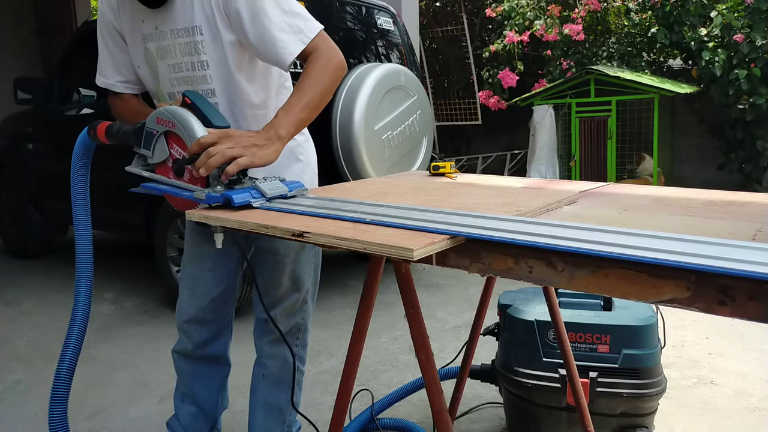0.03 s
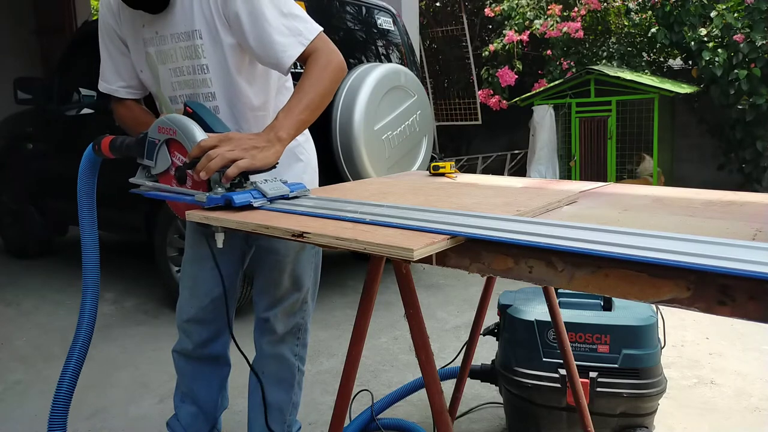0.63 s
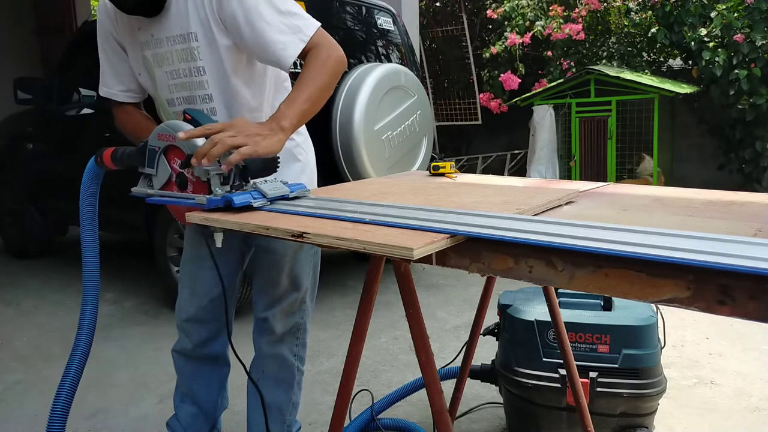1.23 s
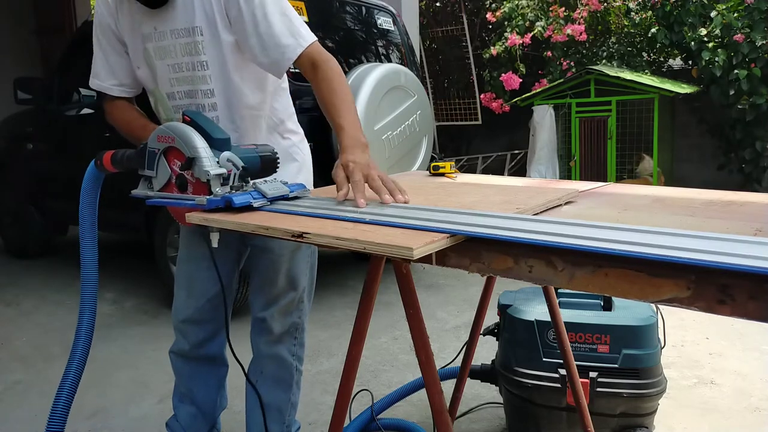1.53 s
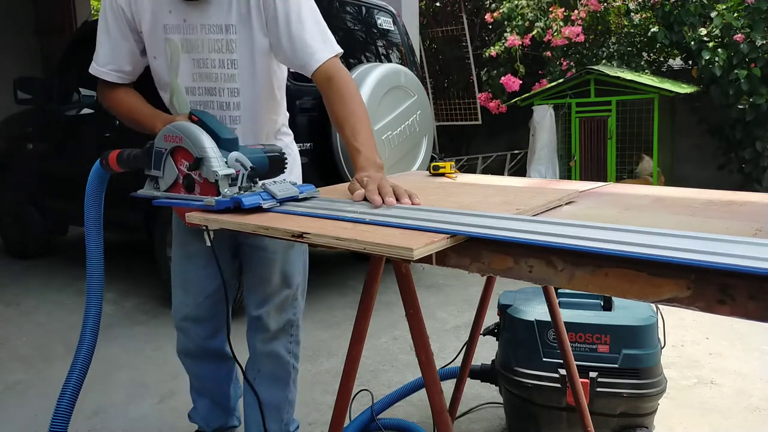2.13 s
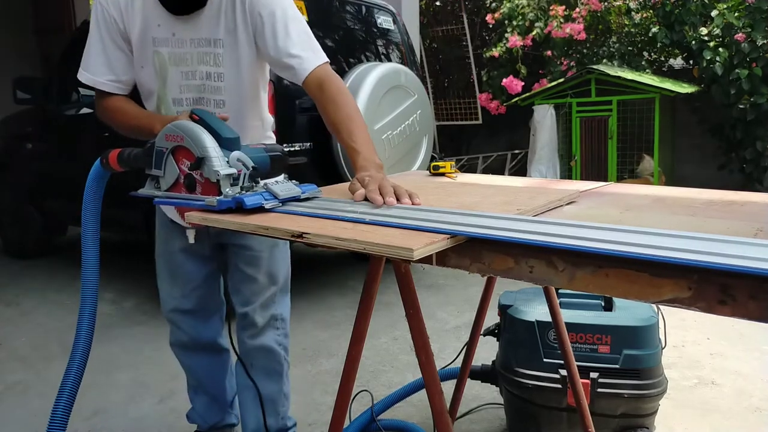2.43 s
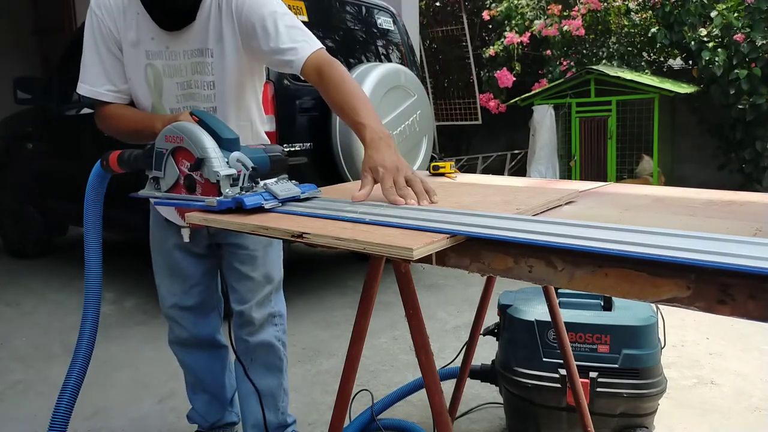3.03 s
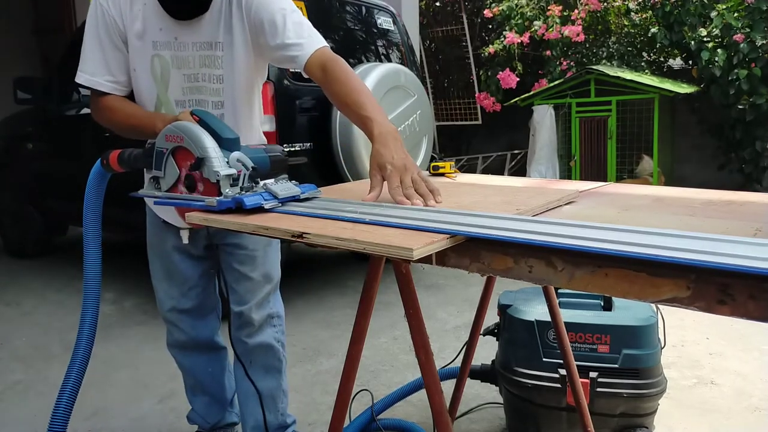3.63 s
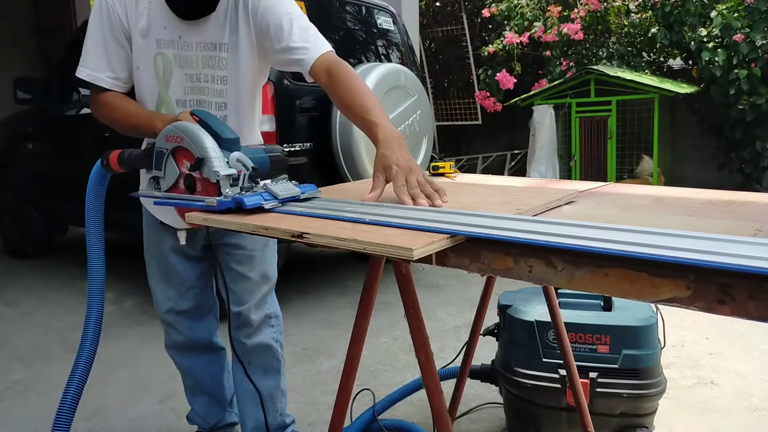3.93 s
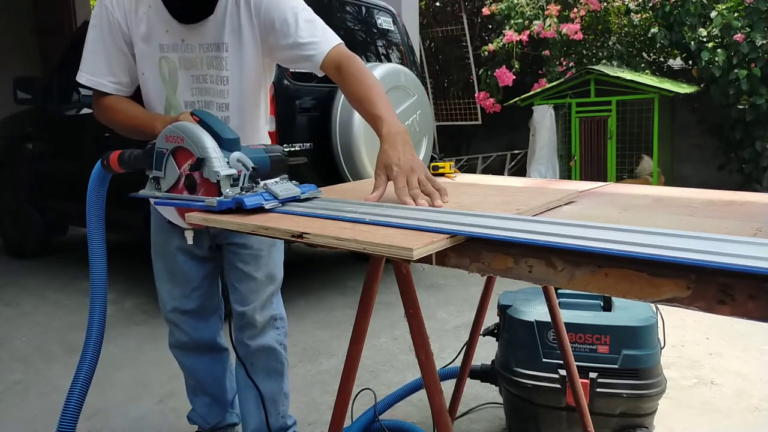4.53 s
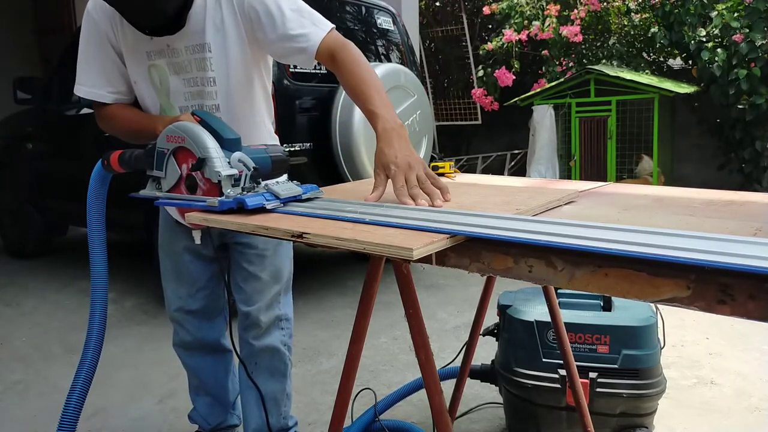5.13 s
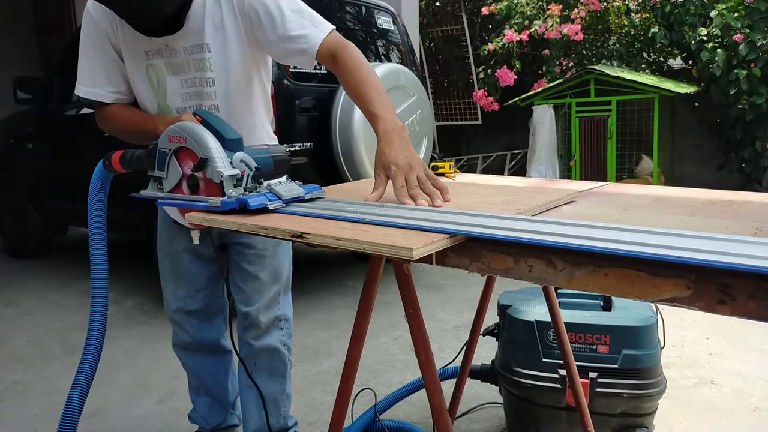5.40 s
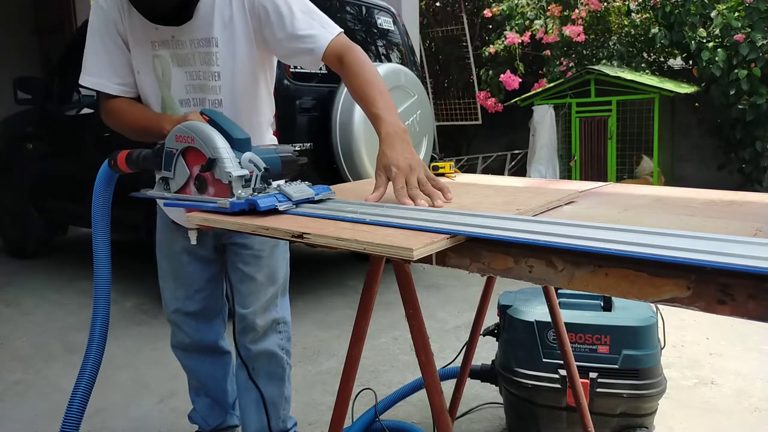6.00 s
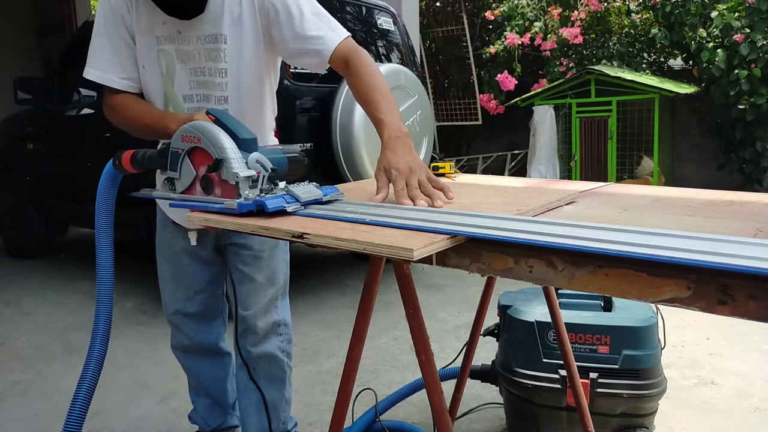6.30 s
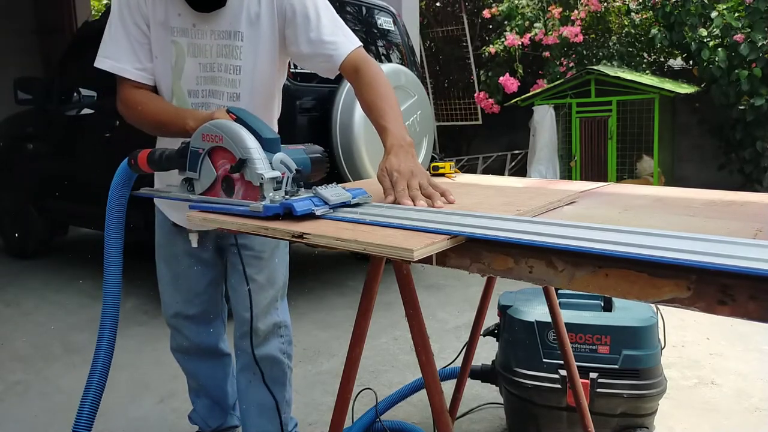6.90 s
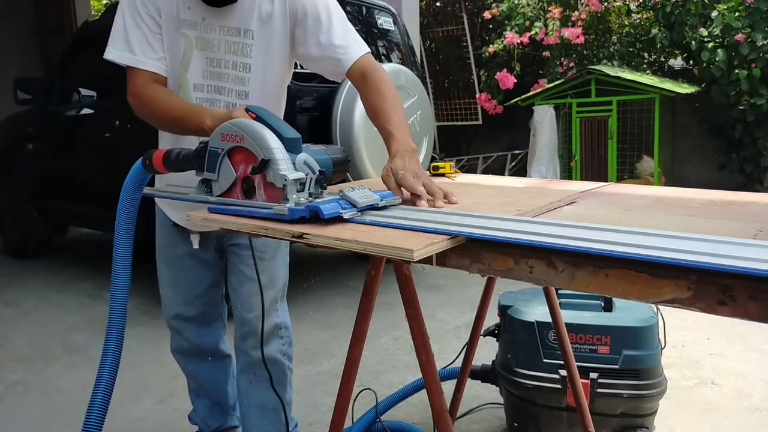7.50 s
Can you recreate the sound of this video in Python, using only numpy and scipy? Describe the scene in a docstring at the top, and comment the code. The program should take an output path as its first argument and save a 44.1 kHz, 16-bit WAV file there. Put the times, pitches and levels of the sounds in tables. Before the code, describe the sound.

In a walled driveway, heard through one microphone, sparrows chirp faintly over a distant street murmur and a light rumble of wind. At about 1 second a board is knocked with a sharp crack, and faint shoe and cloth scuffs follow between 2 and 3.3 seconds. At 3.6 seconds a nearby circular saw jerks on with an electric buzz and a quick clatter of gears, then rises fast to a loud, steady whine with rushing air. At 5 seconds a shop vacuum starts with a short buzz, and the saw drops slightly in pitch and level. Air hisses brightly through the hose, and thin, high whistling tones come and go from 5.5 seconds. From about 6.6 seconds the blade chips into plywood in several short pushes. Two soft pops hit the microphone around 7.5 seconds, with both machines still running.

```python
"""In a walled driveway, sparrows chirp over street murmur and a little wind on the one microphone.
A board is knocked at 1 s, then shoes scuff. At 3.6 s a circular saw jerks into motion: its motor buzzes,
its gears clack and it whines up to speed. At 5 s a shop vacuum cuts in, slowing the saw a little, and air
hisses and whistles through its hose. Brief high tones come and go, and from about 6.6 s the blade is
pushed into plywood. Two soft pops hit the microphone near the end."""
import sys
import numpy as np
from scipy import signal
from scipy.fft import rfft, irfft, next_fast_len
from scipy.io import wavfile
from scipy.ndimage import map_coordinates

SR = 44100
rng = np.random.default_rng(int(sys.argv[2]) if len(sys.argv) > 2 else 0)


def master_out(mix):
    """Clip the mix to full scale and print it as 16-bit PCM to the path in sys.argv[1]."""
    frames = np.transpose(np.atleast_2d(mix))
    ceiling = np.clip(frames, -1, 1)
    pcm = np.round(ceiling * 32767).astype(np.int16)
    wavfile.write(sys.argv[1], SR, pcm)


N = 341775
T = np.arange(N) / SR
MAINS_HZ = 60
FULL_SPEED_HZ = 585  # turns a second of the saw's motor running free

# The tone colour of clashing gear teeth. Each row: frequency in Hz, relative level in dB.
GEAR_SPECTRUM = [(59, -54), (100, -23), (363, -19.5), (498, -17.5), (699, -10.5), (1040, -5), (1400, -1),
                 (1560, -3.5), (2430, -3), (4580, -17), (12100, -24.5), (15600, -17)]
# The hiss in scuffs and chirps. Each row: frequency in Hz, relative level in dB.
RASP_SPECTRUM = [(200, -4), (2000, 1), (7500, -9), (9500, -17), (12500, -15), (15000, -7)]


def saw():
    """The whine and the rush of air grow with the motor's speed, while the hum of its coils fades."""
    speed_hz = motor_speed() * (1 + 0.00143 * wobble(10))
    turn = angle(speed_hz)
    speed_share = speed_hz / FULL_SPEED_HZ
    whine = saw_whine(speed_hz, speed_share, turn)
    current = np.maximum(1 - speed_share, 0) * gate(3.58, rise_s=0.2)
    hum = np.sqrt(2) * amp(-39.5) * current * np.sin(4 * np.pi * MAINS_HZ * T)
    return gate(3.62, rise_s=0.019) * (whine + hum + saw_rush(speed_share, turn))


def saw_whine(speed_hz, speed_share, turn):
    """The shaft's tones climb with its speed, and at certain speeds the housing sings along."""
    # Each row: multiple of the motor's speed, relative level in dB.
    shaft_tones = [(1, 1.5), (2, -5), (4.8, 2.5), (12, 1.5)]
    # Where the housing sings. Each row: motor speed in Hz, half width in Hz, boost in dB.
    singing_speeds = [(346, 62, 5), (497, 18, 9.5), (582, 6.2, 4)]
    tones = np.zeros(N)
    for multiple, db in shaft_tones:
        fade_in = speed_share ** (4 * np.log2(multiple))  # overtones only sing near full speed
        level = amp(db + 2.5 * wobble(16)) * fade_in
        flutter = 0.33 * np.sqrt(multiple) * wobble(50)  # swirling air shakes the high tones more
        tones += level * np.sin(multiple * turn + flutter)
    boost_db = sum(db * bell(speed_hz, hz, half_hz) for hz, half_hz, db in singing_speeds)
    return np.sqrt(2 * speed_share) * amp(-41.5 + boost_db - 11 * mains_sag()) * tones


def saw_rush(speed_share, turn):
    """Fan air, gear rattle and the sizzle of the motor's sliding contacts swell with speed."""
    # The fan's air. Each row: frequency in Hz, relative level in dB.
    fan_spectrum = [(59, -30), (100, -13), (228, -11), (448, -12.5), (566, -10.5), (629, -6), (1140, -4.5),
                    (1370, -1), (1770, -3), (2760, -1.5), (5780, -13.5), (7140, -8.5), (9390, -16.5),
                    (13700, -11.5), (15600, -12.5)]
    # How the guard and housing ring. Each row: pitch in Hz, width in Hz, relative level in dB.
    housing_modes = [(977, 120, -2.5), (1170, 120, -2.5), (1375, 110, -1), (2070, 100, -6.5),
                     (2282, 144, -2), (2682, 59, 1.5), (2765, 37, 3), (3178, 140, 0.5), (3500, 61, -3),
                     (3805, 120, -3.5), (4224, 120, -5.5)]
    # The contacts' sizzle. Each row: pitch in Hz, width in Hz, relative level in dB.
    sizzle_bands = [(7660, 430, -2), (8320, 270, -5), (13450, 620, -2), (15400, 960, 0)]
    # The rush dips and wavers once the vacuum's hiss comes in. Each row: time in seconds, change in dB.
    level_changes = [(5.12, 0.5), (5.22, -1.5), (5.29, 2), (5.6, -4), (6.2, -4), (6.6, -7.5), (7.38, -6),
                     (7.56, -10), (7.75, -6.5)]
    air = noise(fan_spectrum) * amp(0.42 * wobble(30))
    shaking = rng.standard_normal(N) * amp(0.87 * np.sin(turn) + 3 * wobble(250))
    rattle = unit(resonate(shaking, housing_modes))
    crackle = rng.standard_normal(N) * amp(3.2 * wobble(300))
    sizzle = unit(resonate(crackle, sizzle_bands))
    rush = amp(-1.5) * air + amp(-6) * rattle + amp(-7) * sizzle
    run_up_db = -14 * (1 - speed_share ** 2)
    level_db = -20.4 + run_up_db + over_time(level_changes) + 0.3 * wobble(9)
    return amp(level_db) * early_echoes(rush)


def motor_speed(start_s=3.76, run_up_s=0.11, bend=0.64, sag_share=0.0145):
    """The saw motor's turns a second: a fast climb that levels off, then a slight drop."""
    run_up = 1 - np.exp(-(np.maximum(T - start_s, 0) / run_up_s) ** bend)
    return FULL_SPEED_HZ * run_up * (1 - sag_share * mains_sag())


def mains_sag():
    """Goes from 0 to 1 as the vacuum loads the power supply it shares with the saw."""
    return gate(5.04, rise_s=0.0993)


def gear_clacks():
    """The starting jolt throws the gear teeth against each other."""
    # Each row: start in seconds, level in dB.
    clacks = [(3.586, -25), (3.5965, -11), (3.6045, -21.5), (3.613, -13.5), (3.6275, -24.5), (3.644, -24),
              (3.662, -16.5)]
    return blows(clacks, decay_s=0.0061) * noise(GEAR_SPECTRUM)


def switch_on_buzz():
    """A motor at rest draws a surge of current and buzzes at twice the mains frequency."""
    # The saw, then the vacuum. Each row: start in seconds, length in seconds, level in dB.
    surges = [(3.584, 0.12, -27.5), (5.031, 0.082, -20.5)]
    # The tones in the buzz. Each row: pitch in Hz, relative level in dB.
    buzz_tones = [(120, -12), (360, -3), (480, -4), (600, -13), (720, -14), (835, 3), (960, 0), (1080, 0),
                  (1200, -4), (1320, -16), (1430, 0.5), (1560, -3), (1700, 1.5), (1800, -21), (2410, 1.5)]
    out = np.zeros(N)
    for start, length, db in surges:
        hum = sum(amp(tone_db) * np.sin(2 * np.pi * (hz * T + rng.random()) + 0.37 * wobble(40))
                  for hz, tone_db in buzz_tones)
        chatter = noise(GEAR_SPECTRUM) * amp(4 * np.sin(4 * np.pi * MAINS_HZ * T))
        buzz = amp(-5) * unit(hum) + amp(-1.5) * unit(chatter)
        out += amp(db) * gate(start, rise_s=0.0051, end_s=start + length, fall_s=0.072) * buzz
    return out


def cutting(teeth=24, gear_ratio=6.3):
    """With every push the teeth chip the plywood, a little harder on one side of every turn."""
    # Pushes into the wood. Each row: middle in seconds, half length in seconds, level in dB.
    pushes = [(6.62, 0.06, -38), (6.88, 0.2, -32.5), (7.16, 0.086, -27), (7.43, 0.15, -29.5),
              (7.68, 0.16, -29)]
    # Chipping wood. Each row: frequency in Hz, relative level in dB.
    chip_spectrum = [(300, -11), (700, -1.5), (2800, 0), (5500, -4), (8000, 3), (10000, -10), (15000, -21)]
    blade_turn = angle(motor_speed() / gear_ratio)
    bites = amp(3.5 * np.sin(teeth * blade_turn) + 2 * np.sin(blade_turn) + 2 * wobble(120))
    return swells(pushes) * unit(bites * noise(chip_spectrum))


def vacuum():
    """Suction builds up and air hisses, fluttering, through the blade guard and the ribbed hose."""
    # Air in the hose. Each row: frequency in Hz, relative level in dB.
    hose_spectrum = [(1470, -30), (2500, -13), (3120, -11), (3500, -16), (4110, -3.5), (5700, -8),
                     (6350, -4), (7100, -7), (7650, 0.5), (9200, 0), (11700, -7), (13100, -4.5),
                     (14600, 10), (15600, -5)]
    # How loud it hisses. Each row: time in seconds, level in dB.
    hiss_levels = [(5.5, -23), (5.8, -19), (5.93, -21.5), (6.1, -19.5), (6.4, -21.5), (7.1, -20.5),
                   (7.3, -24), (7.38, -18.5), (7.55, -23)]
    flutter_db = 0.8 * wobble(45) + 0.5 * wobble(10)
    suction = gate(5.16, rise_s=0.11)
    return amp(over_time(hiss_levels) + flutter_db) * suction * early_echoes(noise(hose_spectrum))


def hose_whistles(start_s=5.47):
    """The ribbed hose whistles once the air is fast enough."""
    # Each row: pitch in Hz, width in Hz, level in dB.
    whistles = [(3068, 35, -43), (8010, 30, -45), (8803, 7, -39), (14550, 140, -35.5)]
    tones = sum(amp(db) * narrow_tone(hz, width_hz) for hz, width_hz, db in whistles)
    return gate(start_s, rise_s=0.15) * tones


def brief_tones(width_hz=28):
    """Brief high ringing and whistling tones come and go while the saw and vacuum run."""
    # Each row: start in seconds, length in seconds, pitch in Hz, level in dB.
    tones = [(5.52, .2, 8790, -31), (5.72, .13, 11790, -36), (6.5, .35, 6551, -37), (6.52, .3, 6315, -36),
             (6.68, .17, 4720, -36), (6.9, .3, 3030, -35), (7.35, .4, 8775, -36), (7.4, .35, 13770, -35)]
    out = np.zeros(N)
    for start, length, hz, db in tones:
        loudness = gate(start, rise_s=0.014, end_s=start + length, fall_s=0.044)
        out += amp(db) * loudness * narrow_tone(hz, width_hz)
    return out


def board_knock():
    """Wood hits wood with a sharp crack, and the board rings briefly."""
    # Each row: start in seconds, level in dB.
    knocks = [(1.0245, -26)]
    # The crack. Each row: frequency in Hz, relative level in dB.
    crack_spectrum = [(88, -51), (150, -23), (260, -6), (532, -18), (810, 0.5), (1920, -7), (2140, 5),
                      (2430, -7), (5260, -25), (5870, -30), (7730, -25), (9280, -37), (12000, -42),
                      (15600, -69), (22000, -120)]
    # How the board rings. Each row: pitch in Hz, width in Hz, relative level in dB.
    board_modes = [(1240, 63, 8), (2120, 56, -9)]
    impact = blows(knocks, decay_s=0.0027) + amp(-13.5) * blows(knocks, decay_s=0.023)
    crack = impact * noise(crack_spectrum)
    ring = blows(knocks, decay_s=0.029) * unit(resonate(rng.standard_normal(N), board_modes))
    return crack + amp(-12) * ring


def rasps():
    """Short raspy hisses: one on a sparrow's chirp, then shoes and cloth scuffing."""
    # Each row: middle in seconds, half length in seconds, level in dB.
    bursts = [(1.777, 0.028, -54), (2.06, 0.11, -48), (2.844, 0.0093, -55), (3.234, 0.02, -47.5)]
    return swells(bursts) * noise(RASP_SPECTRUM)


def sparrows(fall_octaves_per_s=10.3, second_voice_ratio=1.4):
    """Each chirp slides down in pitch, sung by both sides of the bird's voice box with a raspy hiss."""
    # Each row: start in seconds, length in seconds, starting pitch in Hz, relative level in dB.
    chirps = [(.052, 0.042, 7560, -55.5), (0.311, 0.051, 4530, -56.5), (0.383, 0.099, 6350, -48.5),
              (0.803, 0.031, 7220, -58), (.952, .03, 4500, -56), (1.329, 0.029, 4720, -55),
              (1.385, 0.049, 4300, -53), (1.618, 0.032, 7300, -58), (1.765, 0.051, 4110, -53.5),
              (1.987, 0.11, 6400, -50), (2.347, 0.082, 5860, -48.5), (2.48, 0.086, 5360, -54.5),
              (3.131, .045, 4650, -59), (3.2, .065, 5940, -48.5), (3.415, 0.1, 6200, -48.5)]
    out = np.zeros(N)
    jitter = 0.08 * wobble(1200)
    hiss = amp(-9.5) * noise(RASP_SPECTRUM)
    for start, length, start_hz, db in chirps:
        span = (T >= start) & (T < start + length)
        progress = (T[span] - start) / length
        end_hz = start_hz * 2 ** (-fall_octaves_per_s * length)
        slide_hz = end_hz + (start_hz - end_hz) * (1 - progress) ** 1.8
        phase = angle(slide_hz * (1 + jitter[span] * (1 - 0.5 * progress)))
        voice = np.sin(phase) + amp(-10) * np.sin(second_voice_ratio * phase) + hiss[span]
        arch = np.abs(np.sin(np.pi * progress)) ** 0.49
        out[span] += amp(db) * arch * voice
    tremble = amp(2 * wobble(200))
    # a small boost, weaker in the high treble
    return filtered(out * tremble, lambda hz: amp(over_pitch([(7500, 2.25), (9500, 1.2)], hz)))


def microphone_pops(relax_s=0.081):
    """A sudden push on the microphone's thin diaphragm leaks away and swings back."""
    # Each row: start in seconds, level in dB.
    pops = [(7.464, -27), (7.549, -19.5)]
    return sum(amp(db) * gate(start, rise_s=0.00021, end_s=start, fall_s=relax_s)
               * (1 - (T - start) / relax_s) for start, db in pops)


def wind(breeze_db=-54.5):
    """A breeze with a few gusts rumbles on the microphone."""
    # Each row: middle in seconds, half length in seconds, level in dB.
    gusts = [(2.05, 0.036, -47), (2.35, 0.074, -45.5), (3.99, 0.047, -40), (4.24, 0.075, -41),
             (4.6, .3, -52), (5.27, 0.22, -35.5), (5.72, 0.029, -36)]
    # The rumble. Each row: frequency in Hz, relative level in dB.
    rumble_spectrum = [(15, -2.5), (40, -2.5), (90, -7), (160, -19), (400, -25), (1000, -82)]
    return (amp(breeze_db) + swells(gusts)) * amp(2.2 * wobble(16)) * noise(rumble_spectrum)


def street(engine_hz=232.4, fade_db_per_s=3):
    """A far engine moves away while distant machines hum and the street murmurs."""
    # Each row: pitch in Hz, level in dB.
    machine_hums = [(154, -61.5), (205, -70)]
    # The murmur. Each row: frequency in Hz, relative level in dB.
    murmur_spectrum = [(12, -34), (20, -13.5), (76, 2), (129, -7), (232, -9), (274, -13), (394, -18),
                       (860, -14), (2550, -20.5), (3770, -24), (5260, -33.5), (7770, -31.5), (9190, -43.5),
                       (14300, -33), (15600, -31)]
    engine_db = -56 - fade_db_per_s * T + 3 * wobble(5.73)
    engine = amp(engine_db) * np.sin(angle(engine_hz + 2 * wobble(16)))
    hums = sum(amp(db + 2 * wobble(5)) * np.sin(angle(hz + 2 * wobble(12))) for hz, db in machine_hums)
    murmur = amp(-52 + 0.13 * wobble(4.1)) * noise(murmur_spectrum)
    return murmur + engine + hums


def early_echoes(x, share=0.17, count=12):
    """Quick bounces off board, ground and car strengthen some pitches and weaken others."""
    delays_s = rng.uniform(0.002, 0.018, count)
    copies = sum(np.roll(x, int(delay * SR)) for delay in delays_s) / np.sqrt(count)
    return (x + share * copies) / np.sqrt(1 + share ** 2)


def driveway_echo(x):
    """Walls and car scatter the sound; the treble dies first."""
    # Each row: frequency in Hz, seconds the echo takes to fade by 60 dB.
    fade_times = [(200, 0.9), (2000, 0.36), (6000, 0.37), (14000, 0.29)]
    hz, seconds, bands = signal.stft(rng.standard_normal(SR // 2), SR, nperseg=256)
    fade = amp(-60 * seconds / over_pitch(fade_times, hz)[:, None])
    tail = signal.istft(bands * fade, SR, nperseg=256)[1]
    tail *= 1 - np.exp(-np.arange(len(tail)) / SR / 0.0016)  # soften the start
    return signal.fftconvolve(x, tail / np.linalg.norm(tail))[:N]


def amp(db):
    """Turns decibels into a factor to multiply by."""
    return 10 ** (np.asarray(db) / 20)


def unit(x):
    """Scales a sound to an average (rms) level of 1."""
    return x / np.sqrt(np.mean(x ** 2) + 1e-20)


def over_pitch(points, hz):
    """Reads between (Hz, value) points, with octaves evenly spaced."""
    point_hz, values = np.transpose(points)
    return np.interp(np.log(hz + 1), np.log(point_hz + 1), values)


def over_time(points):
    """Joins (seconds, value) points with straight lines."""
    return np.interp(T, *np.transpose(points))


def wobble(rate):
    """A smooth random curve with `rate` new values a second."""
    return map_coordinates(rng.standard_normal(int(N * rate / SR) + 4), [T * rate], order=2)


def gate(start_s, rise_s, end_s=np.inf, fall_s=1):
    """Rises from 0 toward 1 at start_s and dies away after end_s, if given."""
    opening = 1 - np.exp(-np.maximum(T - start_s, 0) / rise_s)
    return opening * np.exp(-np.maximum(T - end_s, 0) / fall_s)


def blows(rows, decay_s):
    """The loudness curve of sharp hits."""
    return sum(amp(db) * gate(start, rise_s=0.00014, end_s=start, fall_s=decay_s) for start, db in rows)


def bell(x, middle, half_width):
    """A smooth hump of height 1."""
    return np.exp(-((x - middle) / half_width) ** 2)


def swells(rows):
    """The loudness curve of soft rises and falls."""
    return sum(amp(db) * bell(T, middle, half_length) for middle, half_length, db in rows)


def angle(hz):
    """The running angle (phase) of a changing frequency."""
    return 2 * np.pi * np.cumsum(hz) / SR


def narrow_tone(hz, width_hz):
    """A ringing tone that flickers and drifts a little in pitch."""
    flicker = 0.75 + 0.6 * (wobble(2 * width_hz) + 1j * wobble(2 * width_hz))
    phase = angle(hz + 0.4 * width_hz * wobble(8))
    return np.real(flicker * np.exp(1j * phase))


def filtered(x, response):
    """Multiplies each frequency in x by response(hz)."""
    size = next_fast_len(N + SR // 4)
    return irfft(rfft(x, size) * response(np.fft.rfftfreq(size, 1 / SR)), size)[:N]


def noise(spectrum):
    """Noise with the given tone colour, at level 1."""
    return unit(filtered(rng.standard_normal(N), lambda hz: amp(over_pitch(spectrum, hz))))


def resonate(x, modes):
    """Passes x through a body that rings at certain pitches, its modes."""
    def response(hz):
        return sum((-1) ** k * amp(db) * 1j * hz * width / (pitch ** 2 - hz ** 2 + 1j * hz * width)
                   for k, (pitch, width, db) in enumerate(modes))
    return filtered(x, response)


def scene():
    """The near tools are mostly heard directly, the birds mostly as echo."""
    machines = saw() + switch_on_buzz() + vacuum() + hose_whistles() + brief_tones() + cutting()
    short_sounds = gear_clacks() + board_knock() + rasps()
    birds = sparrows()
    echo = driveway_echo(amp(-10.5) * machines + amp(-6) * short_sounds + birds)
    mono = machines + short_sounds + amp(-1.5) * birds + echo + street() + wind() + microphone_pops()
    return np.array([mono, mono])


def record(dry, top_hz=15740):
    """Cuts off the highest treble."""
    return np.array([filtered(channel, lambda hz: hz < top_hz) for channel in dry])


dry = scene()
out = record(dry)
master_out(out)
```